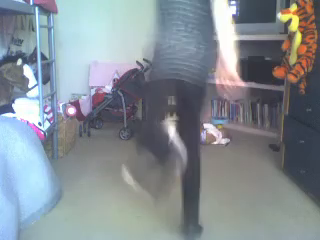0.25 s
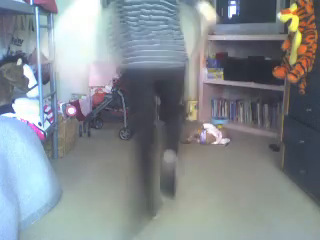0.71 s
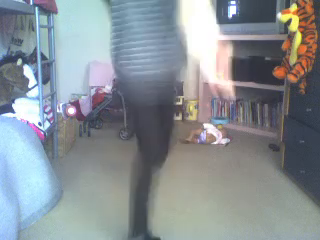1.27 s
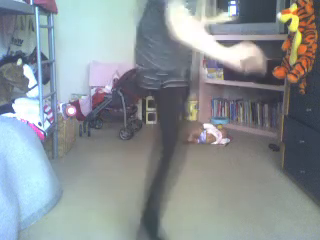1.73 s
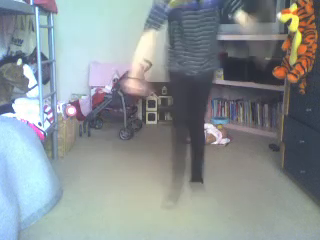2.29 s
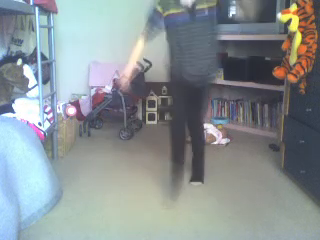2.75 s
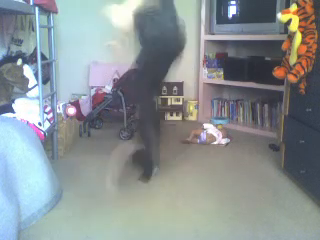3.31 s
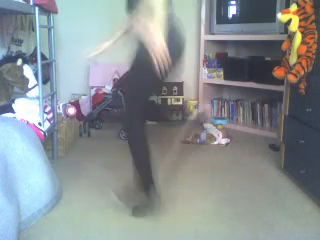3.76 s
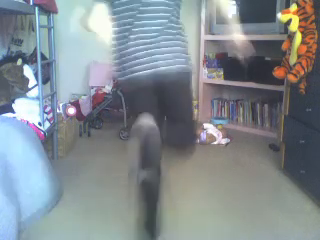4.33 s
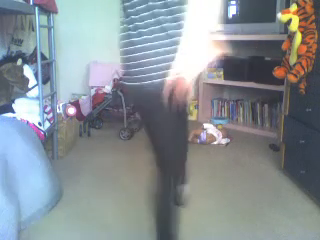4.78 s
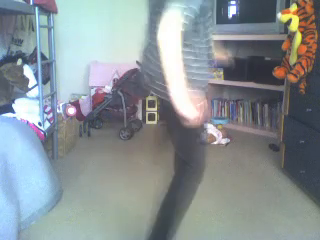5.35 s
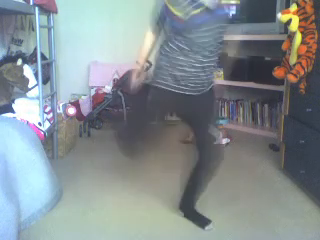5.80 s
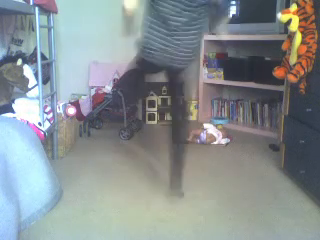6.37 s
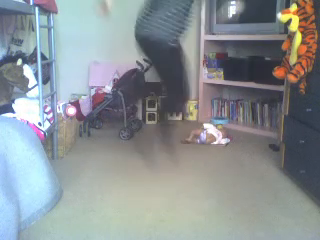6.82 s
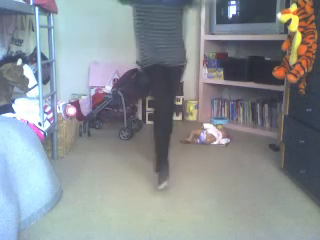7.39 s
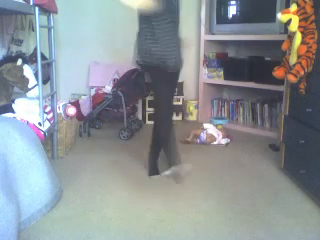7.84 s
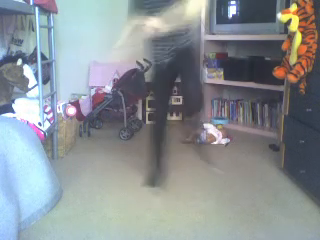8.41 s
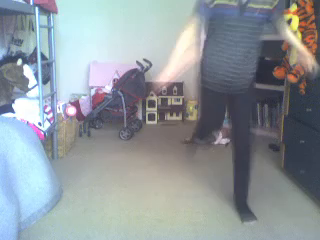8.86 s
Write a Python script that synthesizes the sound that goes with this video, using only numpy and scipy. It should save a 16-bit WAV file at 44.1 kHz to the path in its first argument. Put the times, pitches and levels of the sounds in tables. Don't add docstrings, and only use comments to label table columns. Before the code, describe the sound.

A constant dull hiss and faint buzzing tones lie under uneven foot thumps on a carpeted wooden floor. Heavy and light landings alternate, with low rumble swelling between them and small woody rattles after some. A few impacts distort into brief bursts of fizz and clicks, the strongest past the middle. The small room sounds dry, captured by a poor computer microphone.

```python
import sys
import numpy as np
from scipy import signal
from scipy.fft import rfft, irfft, next_fast_len
from scipy.io import wavfile
from scipy.ndimage import map_coordinates

SR = 44100
rng = np.random.default_rng(int(sys.argv[2]) if len(sys.argv) > 2 else 0)


def store_pcm(level_fs):
    pcm = np.round(np.clip(level_fs, -1, 1) * 32767).astype(np.int16)
    wavfile.write(sys.argv[1], SR, np.atleast_2d(pcm).T)


def convert_level_to_amplitude(level_db):
    exponent = np.asarray(level_db, float) / 20
    return 10 ** exponent


N = 401751


def unit(x):
    return x / np.sqrt(np.mean(x ** 2) + 1e-20)


def along(points, hz):
    f, v = np.transpose(points)
    return convert_level_to_amplitude(np.interp(np.log(hz + 1), np.log(f + 1), v, left=-120, right=-120))


def filtered(x, response):
    size = next_fast_len(N + SR // 2, True)
    hz = np.fft.rfftfreq(size, 1 / SR)
    return irfft(rfft(x, size) * response(hz), size)[..., :N]


def resonant(modes):
    def response(f):
        total = 0
        for k, (centre, width, db) in enumerate(modes):
            damping = 1j * f * width
            sign = (-1) ** k
            total = total + sign * convert_level_to_amplitude(db) * damping / (centre * centre - f * f + damping)
        return total
    return response


def wobble(rate):
    points = rng.standard_normal(int(N * rate / SR) + 4)
    return map_coordinates(points, [np.arange(N) * rate / SR])


def bursts(times, levels_db, t60s, attack):
    power = np.zeros(N + SR)
    t = np.arange(SR // 2) / SR
    for s, db, t60 in zip(times, levels_db, t60s):
        decay = convert_level_to_amplitude(db - 60 * t / max(t60, .02))
        rise = 1 - np.exp(-t / attack)
        power[round(s * SR):][:len(t)] += (decay * rise) ** 2
    return np.sqrt(power[:N])


def hump(centre, width):
    span = np.arange(round((centre - width / 2) * SR), round((centre + width / 2) * SR))
    return span, np.cos(np.pi * (span / SR - centre) / width) ** 2


def electronics():
    # (time [s], level [dB])
    gain = [(0.0, -47.5), (0.81, -45), (1.42, -45.5), (2.94, -46), (3.17, -44), (5.17, -46), (5.66, -46),
            (5.89, -45), (6.39, -46), (6.98, -45.5), (7.69, -48), (8.32, -46.5), (9.11, -43.5)]
    # (frequency [Hz], level per Hz [dB])
    hiss_colour = [(55, 7.5), (110, -10), (250, -8.5), (420, -15.5), (550, -12), (1000, -12.5), (1800, -16),
                   (3000, -20.5), (4600, -26), (5450, -33.5), (5650, -43.5), (6250, -44), (6400, -89.5)]
    # (frequency [Hz], level [dB])
    buzz_tones = [(376.8, -61), (527.6, -58), (602.9, -58.5), (904.4, -66), (979.8, -53), (1050, -63.5),
                  (1206, -58), (1507, -62), (1884, -68.5), (2105, -70.5), (2331, -66.5)]
    # (time [s], level [dB])
    tick = (.184, -21)
    level_db = np.interp(np.arange(N) / SR, *np.transpose(gain))
    noise = unit(filtered(rng.standard_normal(N), lambda f: along(hiss_colour, f)))
    hiss = convert_level_to_amplitude(level_db + 4.0 + 0.88 * wobble(5)) * noise
    tick_s, tick_db = tick
    hiss[round(tick_s * SR):][:6] += convert_level_to_amplitude(tick_db)
    t = np.arange(N) / SR + .00006 * wobble(8)
    buzz = sum(convert_level_to_amplitude(db + 2.0) * np.sin(2 * np.pi * hz * t) for hz, db in buzz_tones)
    return hiss + buzz


def contacts():
    # (time [s], sway [dB], shudder [dB], boom [dB], knock [dB])
    landings = [(0.139, -40, -28, -25, -36), (0.327, -17.5, -36, -21.5, -42),
                (0.525, -17.5, -34.5, -18.5, -22), (0.735, -15.5, -35.5, -23.5, -36.5),
                (0.942, -12.5, -31.5, -28, -34.5), (1.338, -13.5, -28.5, -28, -37),
                (1.662, -16, -29, -17.5, -37.5), (2.078, -15.5, -30, -15, -23.5),
                (2.518, -11, -25.5, -13.5, -26.5), (2.937, -10.5, -27.5, -24, -24.5),
                (3.257, -10.5, -30.5, -26, -37.5), (3.654, -21.5, -27.5, -18.5, -29),
                (4.479, -16, -31.5, -31.5, -38.5), (4.88, -17, -28.5, -24.5, -46),
                (5.215, -18, -40, -17, -44), (5.667, -12, -26, -2.5, -18), (6.484, -17, -32, -12.5, -25),
                (6.68, -18, -50, -37, -49), (6.918, -14, -34.5, -19, -32.5),
                (7.182, -20, -34.5, -24.5, -45), (7.651, -14.5, -26, -30, -44.5),
                (8.102, -14.5, -34, -28, -36.5), (8.474, -12, -27, -26, -29.5),
                (8.799, -9, -25.5, -14, -21)]
    # (time [s], sway [dB], boom [dB], knock [dB])
    heels = [(0.166, -12, -24.5, -29.5), (0.631, -11.5, -17.5, -21.5), (1.049, -40, -26.5, -40.5),
             (1.14, -23, -37.5, -48.5), (1.502, -21.5, -24.5, -43), (1.835, -18, -28.5, -40.5),
             (2.152, -11.5, -15.5, -22.5), (2.299, -24, -26.5, -39), (2.72, -26, -36.5, -49.5),
             (3.1, -16, -28.5, -45), (3.5, -21.5, -42.5, -50.5), (3.711, -8, -17, -25.5),
             (3.82, -22.5, -20.5, -37.5), (3.88, -40, -19.5, -36.5), (4.075, -20, -28, -47),
             (4.22, -22.5, -36.5, -45.5), (5.43, -19.5, -30.5, -47), (5.624, -41, -16.5, -30),
             (5.818, -17.5, -21, -35), (5.9, -20, -31, -50), (6.12, -20, -31.5, -46),
             (6.301, -24.5, -36.5, -46), (6.973, -9, -9.5, -20), (7.095, -17.5, -26, -42),
             (7.383, -24.5, -28, -36.5), (7.9, -20, -44.5, -48.5), (8.011, -37, -28, -39),
             (8.604, -20, -20.5, -29.5), (8.84, -33, -16.5, -23.5), (8.998, -28, -24.5, -35.5)]
    heel_shudder_db = -11
    rolls = [(s, sway, boom + heel_shudder_db, boom, knock) for s, sway, boom, knock in heels]
    return np.transpose(landings + rolls)


def floor_levels():
    s, sway_db, shudder_db, boom_db, knock_db = contacts()
    restless_db = 4 * wobble(7)
    powers = []
    # (levels [dB], peak after contact [s], swell length [s], rest level [dB])
    slow = [(sway_db, .055, .24, -30.5), (shudder_db, .055, .28, -44.5)]
    for levels_db, lag, length, rest_db in slow:
        power = np.pad(convert_level_to_amplitude(rest_db + restless_db) ** 2, (0, SR))
        for at, db in zip(s, levels_db):
            span, swell = hump(max(at + lag, length / 2), length)
            power[span] += (convert_level_to_amplitude(db) * swell) ** 2
        powers.append(power[:N])
    # (levels [dB], rise [s], t60 [s], level over the contact [dB], rest level [dB])
    rumbling = [(boom_db, .3, .6647, 1, -49), (knock_db, .09, .6, 3.5, -51.5)]
    for levels_db, rise, t60, over_db, rest_db in rumbling:
        swell = bursts(s, levels_db + over_db, np.full(len(s), t60), rise)
        powers.append(swell ** 2 + convert_level_to_amplitude(rest_db + restless_db) ** 2)
    return 10 * np.log10(powers)


def joists(sway_db, shudder_db, load_db):
    rest_hz, stiffen_hz_per_db, drift_hz = 12, 0.29, 1.9
    sway_hz = rest_hz + stiffen_hz_per_db * (load_db - load_db.min()) + drift_hz * wobble(4)
    sway = convert_level_to_amplitude(sway_db + 0.93) * np.sin(2 * np.pi * np.cumsum(sway_hz) / SR)
    shudder_modes = [(27.8, 12.95, -2.1), (43, 12.1, 1)]  # (frequency [Hz], width [Hz], level [dB])
    shudder = unit(filtered(rng.standard_normal(N), resonant(shudder_modes)))
    swing = sway + convert_level_to_amplitude(shudder_db + 3.5) * shudder
    return swing / (1 + np.abs(swing / .21) ** 6) ** (1 / 6)


def struck(modes, times, blow_db, rumble_db):
    noise = rng.standard_normal(N)
    blows = np.zeros(N)
    blows[np.round(times * SR).astype(int)] = convert_level_to_amplitude(blow_db)
    cushion = lambda f: 1 / (1 + 1j * f / 330) ** 3
    rumble, ring = filtered(np.array([noise, blows]), lambda f: resonant(modes)(f) * cushion(f))
    return (convert_level_to_amplitude(rumble_db) * rumble + ring) / np.std(rumble)


def boards(boom_on_db, knock_on_db):
    # (frequency [Hz], width [Hz], level [dB])
    boom_modes = [(61.5, 11, -1), (82.2, 7.5, 0.5), (108.4, 10, -4.5)]
    # (frequency [Hz], width [Hz], level [dB])
    knock_modes = [(160, 16, 1), (189, 20, -8.5)]
    # (frequency [Hz], width [Hz], level [dB])
    panel_modes = [(236, 21, 1.5), (281, 15, -2.5), (310, 20, -7)]
    # (time [s], level [dB])
    panel_jolts = [(0.312, -34), (0.367, -38), (0.635, -20), (0.727, -28.5), (1.075, -33), (1.507, -32.5),
                   (1.835, -32), (2.254, -41), (2.325, -37), (2.994, -31.5), (3.105, -33.5), (3.83, -29.5),
                   (3.89, -31), (4.234, -31.5), (4.644, -42), (5.06, -40), (5.231, -32.5), (5.41, -37),
                   (5.633, -23.5), (5.738, -16.5), (5.887, -30), (6.483, -23.5), (6.521, -25.5),
                   (6.998, -21.5), (7.091, -28), (8.659, -31.5), (8.838, -24.5), (8.957, -34.5)]
    s, _, _, boom_db, knock_db = contacts()
    panel_lag_s, panel_under_knock_db = .012, 11
    contact_jolts = [s + panel_lag_s, knock_db - panel_under_knock_db]
    jolt_s, jolt_db = np.hstack([np.transpose(panel_jolts), contact_jolts])
    boom = struck(boom_modes, s, boom_db + 24.5, boom_on_db - 4.5)
    knock = struck(knock_modes, s, knock_db + 27.5, knock_on_db - 4.5)
    panel = struck(panel_modes, jolt_s, jolt_db + 26.5, knock_on_db - 8.0)
    return boom + knock + panel


def shelf():
    # (time [s], lower modes level [dB], upper modes level [dB], t60 [s])
    rattles = [(0.537, -24.5, -28, 0.1), (0.551, -29, -51, 0.12), (1.652, -32, -44, 0.067),
               (2.075, -32, -49.5, 0.11), (2.152, -23.5, -49, 0.11), (2.513, -28, -43, 0.13),
               (3.655, -21.5, -25, 0.099), (3.68, -25.5, -29, 0.12), (3.711, -38, -39, 0.12),
               (3.744, -36, -41, 0.12), (4.052, -30, -44.5, 0.12), (5.621, -33, -48.5, 0.12),
               (6.476, -37, -47.5, 0.2), (8.023, -32.5, -53, 0.084), (8.799, -30, -49, 0.12)]
    # (frequency [Hz], width [Hz], level [dB])
    low_modes = [(647, 70, -6), (780, 78, 1), (1110, 110, -2)]
    # (frequency [Hz], width [Hz], level [dB])
    high_modes = [(1460, 150, -1.5), (1901.5, 160, -3), (2350, 120, -1), (2900, 145, -7.5)]
    s, low_db, high_db, t60 = np.transpose(rattles)
    out = 0
    for modes, level_db in ((low_modes, low_db - 7.0), (high_modes, high_db - 7.0)):
        chatter = rng.standard_normal(N) * convert_level_to_amplitude(3 * rng.standard_normal(N))
        scale = np.std(filtered(chatter, resonant(modes)))
        shaken = chatter * bursts(s, level_db, t60, attack=0.00048)
        out = out + filtered(shaken, resonant(modes)) / scale
    return out


def overflow(x):
    # (time [s], length [ms], limit the wave sits on [+1 or -1],
    #             share of samples flipped [0-1], depth [0-1])
    wraps = [(.6014, 4.5, -1, .13, 1), (.6375, .3, 1, .4, .4), (.6408, 2.3, 1, .45, 1), (.657, 0, 1, 1, .1),
             (2.973, 0, 1, 1, .12), (2.9788, .1, -1, .5, 1), (2.9918, 0, -1, 1, .95), (3.002, 0, 1, 1, .35),
             (5.678, .1, 1, 0, .5), (5.683, 5.2, 1, .5, 1), (5.6915, .3, 1, .5, .8), (5.712, 0, -1, 1, .95),
             (5.7173, .15, -1, .5, 1), (5.7305, 0, 1, 1, .12), (5.736, 0, 1, 1, .65), (5.7415, 7, 1, .5, 1),
             (6.9668, 0, 1, 1, .35), (6.9722, 0, -1, 1, 1), (6.9774, .4, -1, .5, 1),
             (7.0018, 2.4, 1, .45, 1), (7.0133, 0, 1, 1, .3), (7.0181, 0, -1, 1, .95),
             (7.0292, 0, -1, 1, 1), (7.0425, 0, 1, 1, .2)]
    # (centre [s], width [ms], level [dB])
    fizz_swells = [(0.6042, 18.7, -21.5), (.64, 18.7, -21), (.653, 8.6, -42), (2.976, 24, -33.5),
                   (2.994, 20.8, -29), (5.675, 9.1, -31), (5.687, 23, -16), (5.714, 19.8, -26),
                   (5.728, 18, -38), (5.746, 21, -14), (6.97, 18, -31), (6.98, 14.7, -27),
                   (7.002, 17.7, -19), (7.019, 30, -29.5), (7.033, 19, -34)]
    # (frequency [Hz], level [dB])
    fizz_colour = [(300, -21.5), (900, 0.5), (3000, 0), (10500, -3.5), (11000, -12.5), (12200, -14.5),
                   (12700, -39), (16000, -44), (16600, -89)]
    wave = x.copy()
    jumps = np.zeros((2, N))
    luck = rng.random(N)
    for s, length_ms, side, share, depth in wraps:
        span, pin = hump(s + length_ms / 2000, .003 * length_ms + .01)
        lean = side * (0.25 + 0.02 * length_ms)
        wave[span] += depth ** 2 * pin * (lean - wave[span])
        at = round(s * SR) + 2 * np.arange(int(length_ms * SR / 2000) + 1)
        hit = at[(luck[at] < share) | (at == at[0]) | (at == at[-1])]
        jumps[int(depth < .5), hit] = depth * (-side * 0.79 - wave[hit])

    smear = np.zeros(N)
    for s, width_ms, db in fizz_swells:
        span, swell = hump(s, width_ms / 1000)
        smear[span] += convert_level_to_amplitude(db) * swell ** 0.5
    fizz = smear * unit(filtered(rng.standard_normal(N), lambda f: along(fizz_colour, f)))

    def jump_colour(f):
        images = 2 / (1 + (f / 10700) ** 40) + 0.097
        deep = f ** 2 / (f ** 2 + 260 ** 2)
        shallow = 3.6 * f ** 4 / (f ** 4 + 4500 ** 4) / (1 + (f / 11500) ** 16)
        return images * np.array([deep, shallow])

    wave = wave + fizz + filtered(jumps, jump_colour).sum(axis=0)
    return wave / (1 + np.abs(wave / .76) ** 8) ** (1 / 8)


def socks():
    # (centre [s], width [ms], centre frequency [Hz], level [dB])
    scuffs = [(.875, 130, 2300, -45.5), (.885, 60, 1000, -41), (2.49, 120, 1800, -45),
              (3.08, 160, 1200, -43), (3.72, 130, 1300, -47), (3.83, 166, 1100, -49),
              (4.4, 72, 2000, -44.5), (5.212, 30, 750, -41), (6.165, 90, 1530, -42),
              (8.63, 90, 1000, -42.5), (8.77, 60, 2600, -43.5)]
    out = np.zeros(N)
    for s, width_ms, hz, db in scuffs:
        span, swell = hump(s, width_ms / 1000)
        band = signal.butter(2, [hz / 1.51, hz * 1.21], "band", fs=SR, output="sos")
        brush = unit(signal.sosfilt(band, rng.standard_normal(SR // 2)))
        out[span] += convert_level_to_amplitude(db) * swell * brush[-len(span):]
    return out


def scene():
    sway_db, shudder_db, boom_db, knock_db = floor_levels()
    floor = joists(sway_db, shudder_db, boom_db) + boards(boom_db, knock_db)
    return (electronics() + floor + shelf() + socks())[None]


def top_cut(x):
    return signal.sosfilt(signal.butter(12, 16800, fs=SR, output="sos"), x)


def record(dry):
    heard = filtered(dry[0], lambda f: 1 / (1 + (f / 6350) ** 60))
    stored = filtered(overflow(heard), lambda f: 1 / (1 + (f / 15900) ** 60))
    return top_cut(stored[None])


dry = scene()
out = record(dry)
store_pcm(out)
```